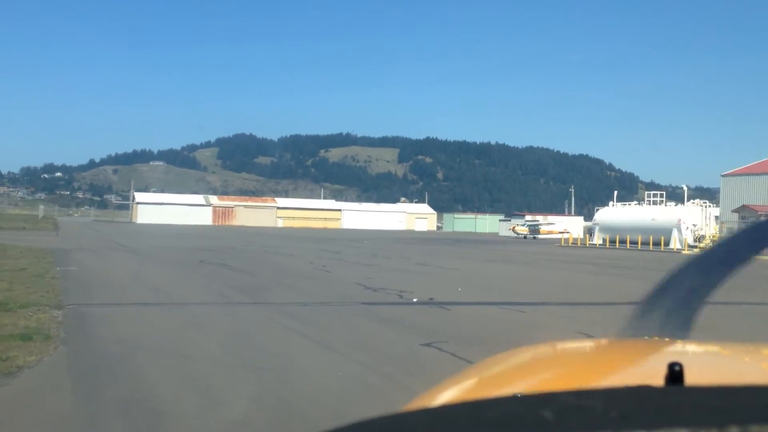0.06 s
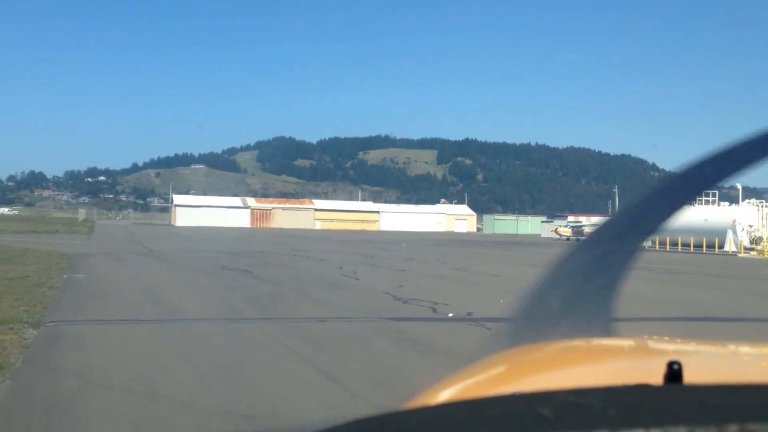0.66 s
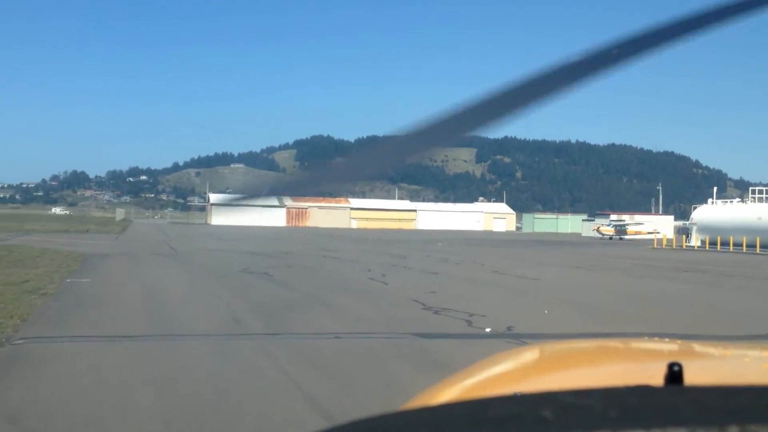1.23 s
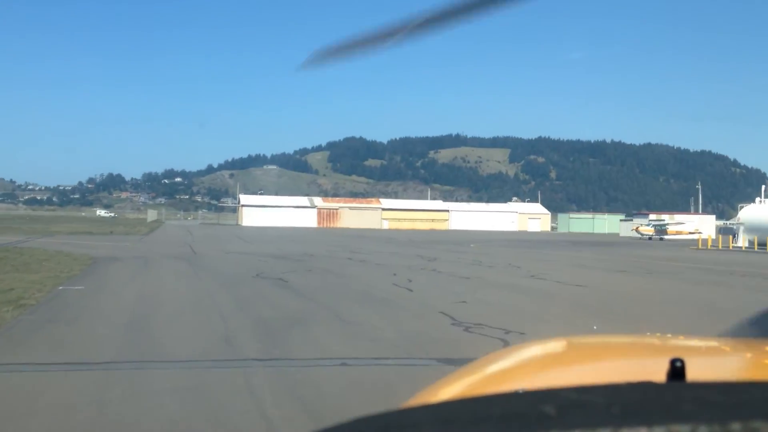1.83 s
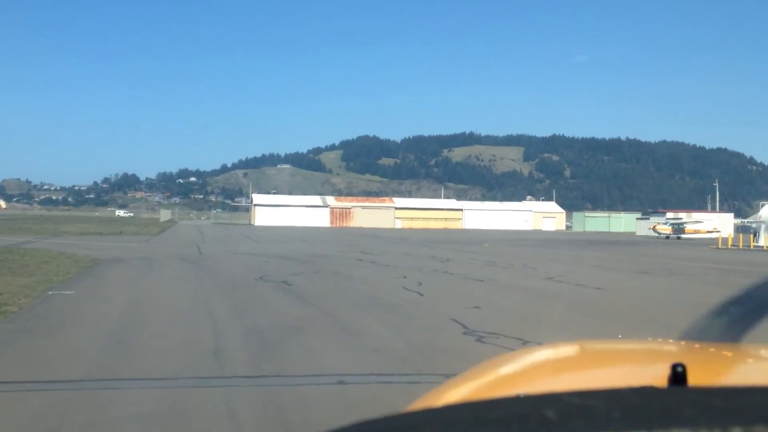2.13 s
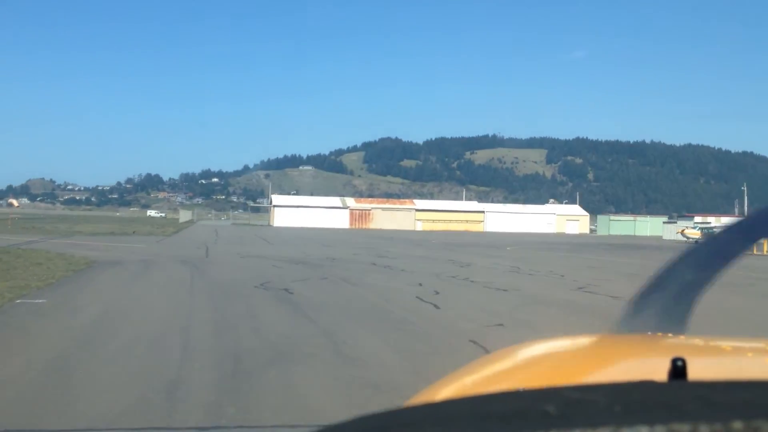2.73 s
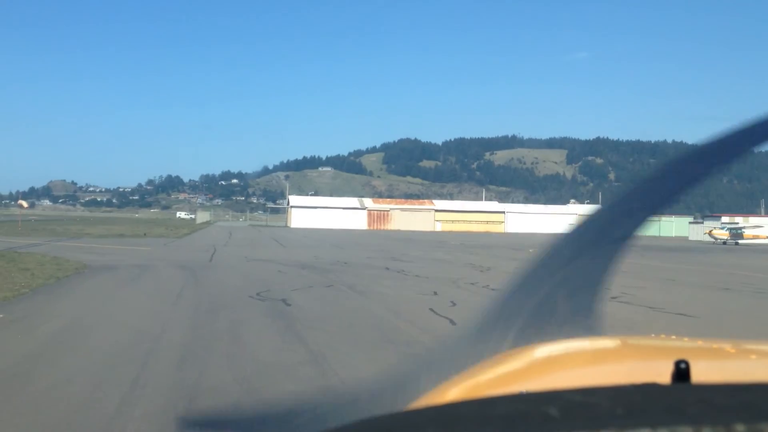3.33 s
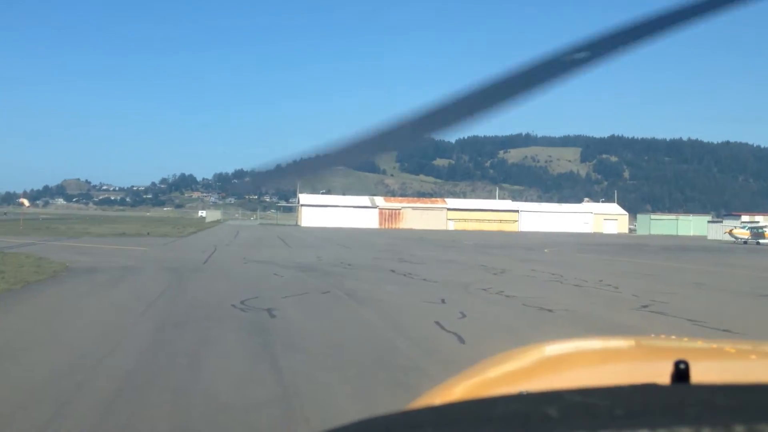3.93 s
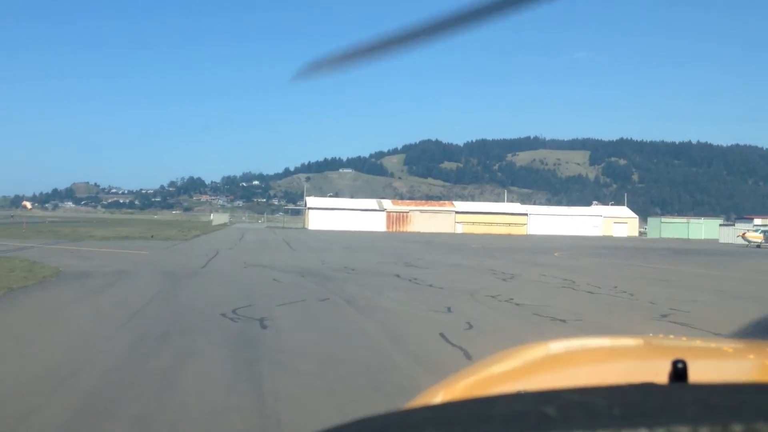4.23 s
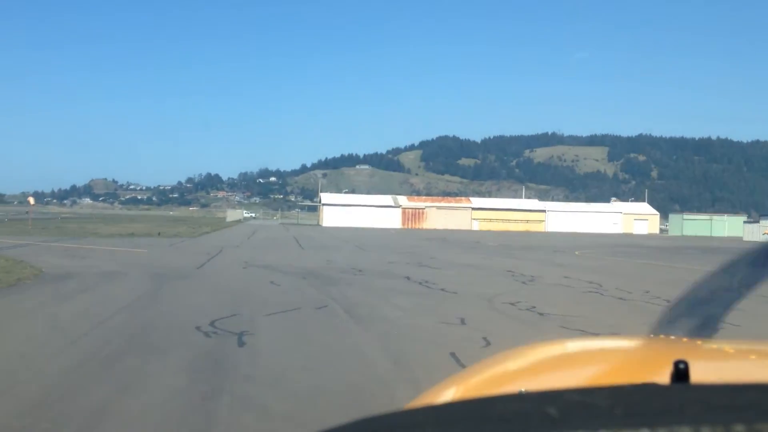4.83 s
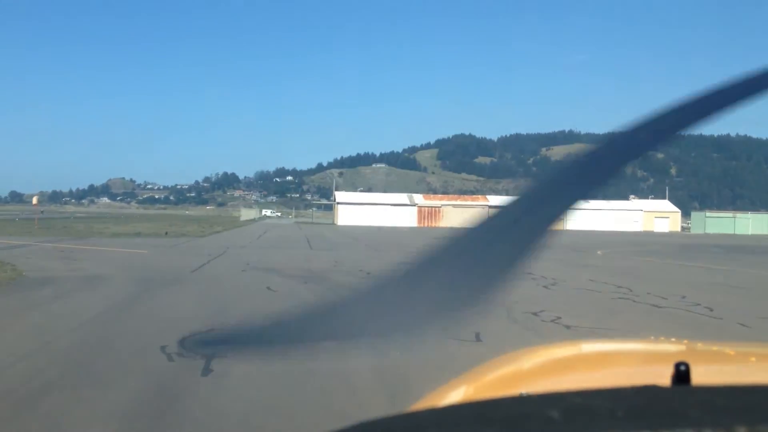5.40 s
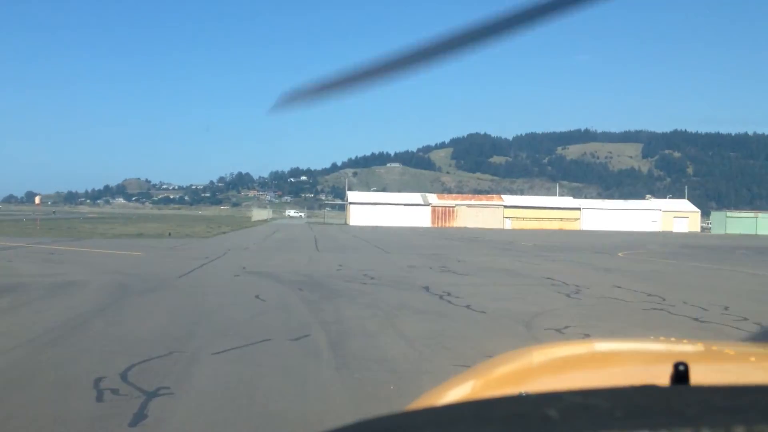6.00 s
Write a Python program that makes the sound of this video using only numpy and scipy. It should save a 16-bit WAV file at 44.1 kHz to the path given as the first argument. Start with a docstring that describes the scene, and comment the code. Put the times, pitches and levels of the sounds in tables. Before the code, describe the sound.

A small propeller plane's piston engine drones at idle, heard inside the cockpit with a high whine, hiss and a few rattling knocks.

```python
"""A four-cylinder piston engine and its two-blade propeller drone at about 1000 rpm,
heard in the cockpit of a taxiing plane. Periodic exhaust and blade pulses give a harmonic series;
their turbulence excites the cabin air and panels. The airframe knocks on the uneven apron and
the trim ticks. The gyros of the instrument panel whine over the hiss of their air and bearings."""
import sys
import numpy as np
from scipy import signal
from scipy.fft import rfft, irfft, next_fast_len
from scipy.io import wavfile
from scipy.ndimage import uniform_filter1d, map_coordinates

SR = 44100
rng = np.random.default_rng(int(sys.argv[2]) if len(sys.argv) > 2 else 0)


def master_out(mix):
    """Clip the mix to full scale and print it as 16-bit PCM to the path in sys.argv[1]."""
    frames = np.transpose(np.atleast_2d(mix))
    ceiling = np.clip(frames, -1, 1)
    pcm = np.round(ceiling * 32767).astype(np.int16)
    wavfile.write(sys.argv[1], SR, pcm)


N = 267025
TIME = np.arange(N) / SR
FIRINGS_PER_TURN, LEAD_HARMONIC = 2, 31

# spectrum of a trim tick: f/Hz, relative level/dB
TICK_SPECTRUM = [(1000, -20), (2800, -3), (7000, -3), (11000, 2), (15000, 0)]
# spells of ticking: t/s, gain on the tick rate/dB
TICK_ACTIVITY = [(0, 1), (0.3, 7), (0.5, -4), (2.5, -3), (3.3, -4), (4.8, 1), (5.3, 11), (5.7, 3),
                 (6.05, 5)]
# air and bearing noise: f/Hz, relative level/dB
HISS_SPECTRUM = [(1500, -2.5), (2800, -9), (3300, -12.5), (4200, -5), (4700, -2.5), (5250, 1), (5480, -4.5),
                 (5800, -2.5), (6200, -8.5), (7200, -15), (8200, -19.5), (10000, -21.5), (12500, -26.5),
                 (15300, -30)]
# tones of the other instruments: f/Hz, level/dB
INSTRUMENT_TONES = [(1627, -60), (4224, -61), (4360, -61), (4409.5, -50), (4546.5, -51), (5158, -58),
                    (5298, -55), (5903, -61), (9388, -68), (9857, -75)]
# rotation rate of the gyro: t/s, f/Hz
ROTOR_SPEED = [(0, 172.72), (1, 172.72), (2.4, 172.91), (3.8, 172.83), (6.05, 173.15)]
# partials of the gyro: harmonic number, level/dB
ROTOR_HARMONICS = [(11, -56.0), (13, -57.0), (16, -63.5), (18, -58.0), (20, -66.0), (21, -64.0),
                   (22, -55.0), (23, -66.0), (24, -51.0), (25, -53.5), (26, -52.5), (27, -49.5),
                   (28, -41.5), (29, -59.0), (30, -48.5), (31, -38.0), (32, -55.5), (33, -45.0),
                   (34, -52.0), (35, -52.5), (36, -51.5), (38, -65.5), (39, -66.0), (43, -67.5),
                   (45, -70.0), (48, -67.5), (53, -69.5), (62, -77), (65, -78), (73, -81), (74, -79.5)]
# partials on the flank of a case resonance: harmonic number, level per rotor speed/(dB/Hz)
RESONANCE_SLOPES = [(22, 27), (33, -10.5)]
# swell of the gyro's strongest partial: t/s, relative level/dB
LEAD_SWELL = [(0, 1), (0.8, -0.5), (1.4, 1), (2.2, 3.5), (2.6, 0.5), (3.6, 2.5), (6.05, 1.5)]
# cabin panel modes: f/Hz, bandwidth/Hz, relative level/dB
PANEL_MODES = [(300, 51, 0), (352, 82, -1.5), (441, 39, 2), (542, 49, 2), (636, 48, -2.5), (786, 67, -3),
               (860, 29.6, 2), (1010, 16.4, -2.5), (1229, 34.6, -0.5), (1685, 200, -16.5), (2936, 124, -15)]
# rough stretches of apron: t/s, duration/s, relative level/dB
ROUGH_GROUND = [(0.093, 0.3, -32), (2.52, 0.4, -24)]
# hardest airframe knocks: t/s, relative level/dB, contact f/Hz
HARD_KNOCKS = [(0.014, -19.5, 720), (0.127, -15.5, 370), (0.189, -16, 420), (0.245, -22, 700),
               (0.277, -17, 640), (0.315, -12, 308), (0.412, -20, 800), (1.073, -13.5, 670),
               (1.130, -15, 676), (2.53, -15.5, 740), (2.586, -18.5, 800), (2.703, -18, 640),
               (2.763, -13.5, 500), (2.823, -13, 570), (2.85, -16, 795), (2.93, -15.5, 700)]
# propeller wash on cowling and windscreen: f/Hz, relative level/dB
WASH_SPECTRUM = [(12, -30), (32, -37), (70, -45), (150, -2.5), (330, 5), (560, -0.5), (700, 1.5),
                 (920, -0.5), (1100, -5.5), (1600, -18.5), (2100, -12.5), (2600, -30), (3500, -14),
                 (14000, -48)]
# cabin boom: f/Hz, relative level/dB
BOOM_SPECTRUM = [(40, -55), (60, -39), (80, -20), (110, -4), (145, -1), (178, 2), (215, -3.5), (250, -10.5),
                 (285, -7.5), (350, -20), (600, -28), (1500, -46), (5000, -90)]
# cylinders in firing order: relative level/dB
CYLINDER_LEVELS = [-6.5, -4.5, -3, -2.5]
# firing rate of the engine: t/s, f/Hz
FIRING_RATE = [(0, 33.05), (0.9, 32.8), (1.35, 33.19), (1.8, 32.87), (2.7, 33.01), (3.9, 32.75),
               (4.65, 32.95), (5.2, 32.7), (6.05, 32.87)]
# exhaust and propeller harmonics: multiple of the crankshaft speed, level/dB
ENGINE_ORDERS = [(4, -39), (6, -32.5), (8, -30.5), (11, -43), (12, -35), (13, -45), (14, -44), (16, -41),
                 (18, -51.5)]


def from_db(db):
    """Amplitude ratio of a level in decibels."""
    return 10 ** (np.asarray(db) / 20)


def rms_one(x):
    """Normalisation to unit rms."""
    return x / np.sqrt(np.mean(x ** 2) + 1e-20)


def in_time(curve):
    """Linear interpolation of (t, value) points at every sample."""
    return np.interp(TIME, *np.transpose(curve))


def wander(rate):
    """Slow random modulation: a spline through `rate` points a second, deviation about 1."""
    points = rng.standard_normal(2048)
    path = map_coordinates(points, [TIME[::64] * rate + 4], order=3, mode="wrap")
    return np.interp(TIME, TIME[::64], path)


def colour(x, spectrum):
    """Spectral shaping by (f, level) points, at unit rms."""
    size = next_fast_len(N)
    hz, db = np.transpose(spectrum)
    gain = from_db(np.interp(np.log(np.fft.rfftfreq(size, 1 / SR) + 1e-6), np.log(hz), db))
    return rms_one(irfft(rfft(x, size) * gain, size)[:N])


def steady(x, span_s):
    """Division by the running rms flattens the envelope of a noise."""
    size = int(span_s * SR)
    power = uniform_filter1d(uniform_filter1d(x ** 2, size), size)
    return rms_one(x / np.sqrt(power + 1e-9))


def resonate(x, hz, width_hz):
    """Forced response of a damped oscillator with unit peak gain."""
    r = np.exp(-np.pi * width_hz / SR)
    feedback = [1, -2 * r * np.cos(2 * np.pi * hz / SR), r * r]
    return signal.lfilter(np.array([1, 0, -1]) * (1 - r * r) / 2, feedback, x)


def trim_ticks():
    """Vibrating trim clicks as a Poisson process of varying rate: many weak ticks, a few stronger."""
    ticks_per_s = 110 * from_db(in_time(TICK_ACTIVITY) + 5 * wander(12))
    onsets = rng.random(N) < ticks_per_s / SR
    sizes = from_db(4 * np.minimum(rng.exponential(1, N), 4)) * rng.choice([-1, 1], N)
    return from_db(-61.5) * colour(onsets * sizes, TICK_SPECTRUM)


def instrument_hiss(turns, firings):
    """Air and bearing noise is amplitude-modulated by the rotor's turning and the engine's shaking."""
    shaking = 1 + .1 * np.cos(2 * np.pi * firings) + .07 * wander(50)
    pulsing = (1 + 0.037 * np.cos(2 * np.pi * turns)) * shaking
    air = colour(pulsing * rng.standard_normal(N), HISS_SPECTRUM)
    case = rms_one(resonate(pulsing * rng.standard_normal(N), hz=5410, width_hz=230))
    return from_db(-37) * air + from_db(-54.5) * case


def partial(cycles, db):
    """Simple harmonic motion of given rms level and random initial phase."""
    return np.sqrt(2) * from_db(db) * np.sin(2 * np.pi * (cycles + rng.random()))


def instrument_tones():
    """Other instruments add faint tones with slight random phase and amplitude modulation."""
    return sum(partial(hz * TIME + 0.13 * wander(5.1), db + wander(2.65))
               for hz, db in INSTRUMENT_TONES)


def gyro_whine(rotor_hz, turns):
    """Resonance of the case favours some rotor harmonics; vibration makes them all flutter."""
    speed_offset_hz = rotor_hz - rotor_hz.mean()
    swell_db = {k: slope * speed_offset_hz for k, slope in RESONANCE_SLOPES}
    lead_db = in_time(LEAD_SWELL)
    swell_db[LEAD_HARMONIC] = lead_db - lead_db.mean()
    out = 0
    for k, db in ROTOR_HARMONICS:
        flutter_db = 0.93 * wander(30)
        out += partial(k * turns, db + swell_db.get(k, 0) + flutter_db)
    return from_db(-0.06) * out


def panels(force):
    """Modal superposition: the panels ring under one force, and their lining absorbs the treble."""
    ringing = sum((-1) ** k * from_db(db) * resonate(force, hz, width)
                  for k, (hz, width, db) in enumerate(PANEL_MODES))
    return signal.sosfilt(signal.butter(2, 3000, fs=SR, output="sos"), ringing)


def rattle_blows(firing_hz):
    """Forced rattling: on rough ground a loose part strikes about once a firing; rows of t, level, f."""
    blows = []
    for start, duration, db in ROUGH_GROUND:
        times = np.arange(start, start + duration, 1 / firing_hz)
        for t, (late, harder, higher) in zip(times, rng.standard_normal((64, 3))):
            blows.append((t + 0.00296 * late, db + 2.5 * harder, 640 * 2 ** (0.21 * higher)))
    return blows


def airframe_knocks(blows):
    """Impact excitation: a loose part hits and chatters; soft contacts thud, hard ones clack."""
    out, age = np.zeros(N), np.arange(SR // 10) / SR
    chatter_envelope = from_db(-19.5) * np.exp(-age / .005)
    for t, db, hz in blows:
        force = chatter_envelope * rng.standard_normal(len(age))
        force[0] += 1  # the first hit
        contact = resonate(force, hz, width_hz=0.73 * hz)
        clack = signal.sosfilt(signal.butter(2, 1400, fs=SR, output="sos"), contact)
        knock = rms_one(rms_one(panels(contact)) + from_db(-9) * rms_one(clack))
        start = int(t * SR)
        out[start:start + len(age)] += from_db(db - 19) * knock[:N - start]
    return out


def puffs(firings, decay_cycles, uneven_db):
    """Pressure jumps at each firing, by an uneven amount, and decays exponentially."""
    count = firings.astype(int)
    cylinder_db = np.array(CYLINDER_LEVELS)[count % len(CYLINDER_LEVELS)]
    strength = from_db(cylinder_db + uneven_db * rng.standard_normal(512)[count])
    return rms_one(strength * np.exp(-(firings % 1) / decay_cycles))


def propeller_wash(firings):
    """Turbulence from each blade, one per firing, roars on the skin and drives the panel modes."""
    pulsing = 2.5 + puffs(firings, decay_cycles=1.0, uneven_db=2.0)
    roar = colour(pulsing * rng.standard_normal(N), WASH_SPECTRUM)
    ringing = rms_one(panels(pulsing * rng.standard_normal(N)))
    return from_db(-35.5) * (roar + ringing)


def firing_thumps(firings, hz=174, width_hz=118):
    """Each firing's random departure from the mean is an impulse to the resonant cabin air."""
    starts = np.flatnonzero(np.diff(np.floor(firings))) + 1
    kicks = np.zeros(N)
    kicks[starts] = rng.uniform(-1, 1, 512)[:len(starts)]
    ringing = resonate(kicks + 1e-18, hz, width_hz)
    return from_db(-32) * rms_one(resonate(ringing, hz, width_hz))


def cabin_boom(firings):
    """Turbulent exhaust puffs force the cabin air: a steady low noise with a slight random throb."""
    turbulence = (2.5 + puffs(firings, decay_cycles=0.62, uneven_db=0.5)) * rng.standard_normal(N)
    throb_db = 0.5 * wander(22)
    return from_db(-27.5 + throb_db) * steady(colour(turbulence, BOOM_SPECTRUM), span_s=0.049)


def engine_drone(firings, firing_hz, cabin_hz=113.8, width_hz=31.0):
    """Periodic exhaust and blade pulses form harmonics; muffler and cabin resonance delay their phase."""
    out = 0
    for order, db in ENGINE_ORDERS:
        per_firing = order / FIRINGS_PER_TURN
        lag = 2 * np.arctan(2 * (per_firing * firing_hz - cabin_hz) / width_hz)
        amplitude = np.sqrt(2) * from_db(db + wander(6.4))
        out += amplitude * np.cos(2 * np.pi * per_firing * firings - lag)
    return out


def scene():
    """Superposition of instruments, airframe and engine at the seat."""
    firing_hz, rotor_hz = in_time(FIRING_RATE), in_time(ROTOR_SPEED)
    firings = np.cumsum(firing_hz * (1 + .002 * wander(12))) / SR
    # phase jitter from the shaking panel blurs the highest rotor partials most
    turns = np.cumsum(rotor_hz) / SR + .0004 * wander(35)
    engine = engine_drone(firings, firing_hz.mean()) + cabin_boom(firings)
    engine += firing_thumps(firings) + propeller_wash(firings)
    instruments = gyro_whine(rotor_hz, turns) + instrument_tones() + instrument_hiss(turns, firings)
    airframe = airframe_knocks(HARD_KNOCKS + rattle_blows(firing_hz.mean())) + trim_ticks()
    return (instruments + airframe + engine)[None]


def record(dry):
    """A steep low-pass filter limits the bandwidth to 15.2 kHz."""
    return signal.sosfilt(signal.ellip(12, .1, 90, 15200, fs=SR, output="sos"), dry)


dry = scene()
out = record(dry)
master_out(out)
```